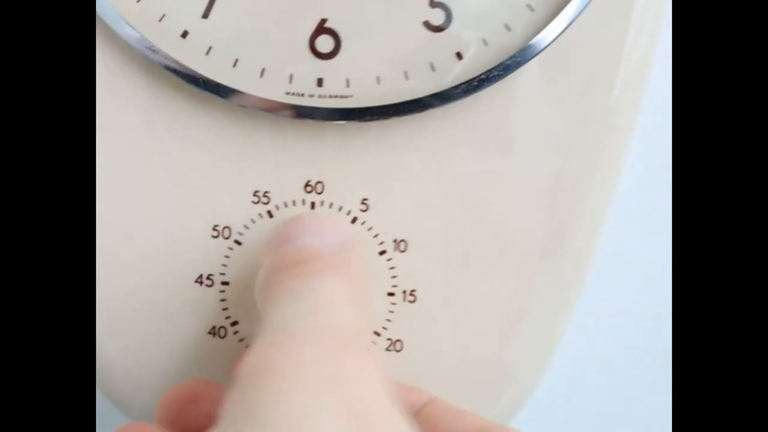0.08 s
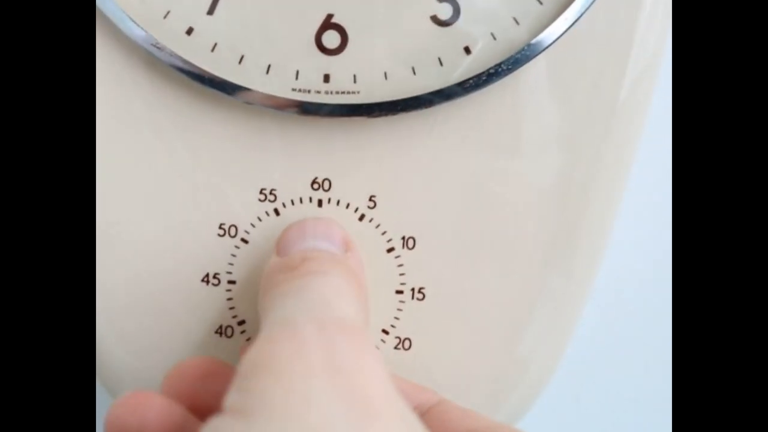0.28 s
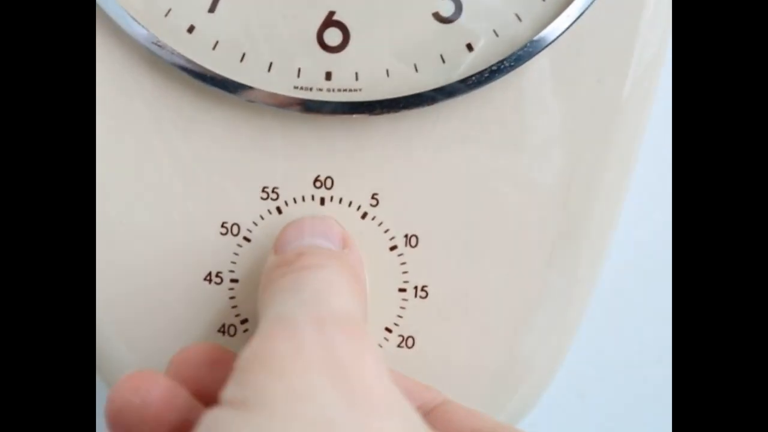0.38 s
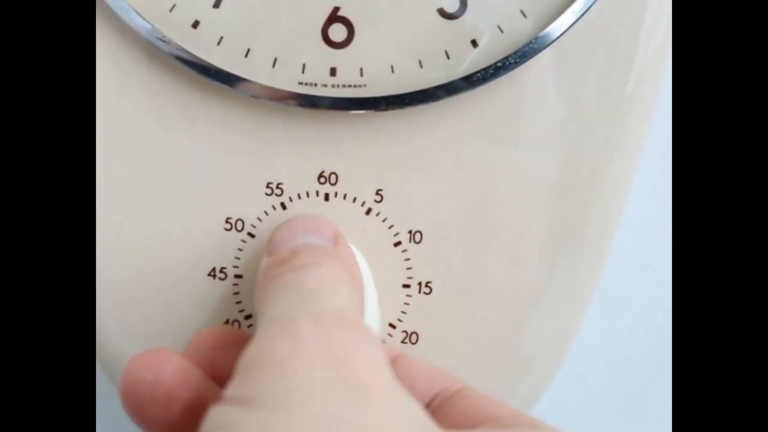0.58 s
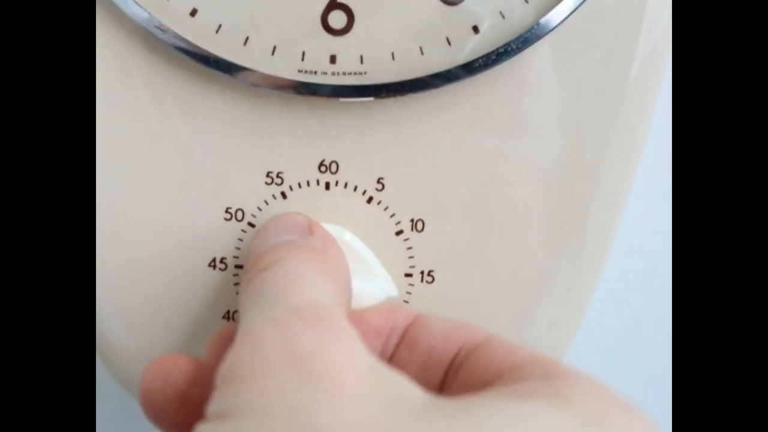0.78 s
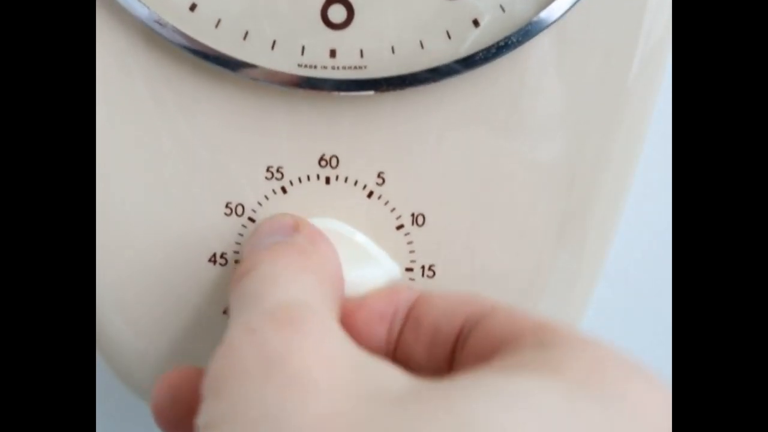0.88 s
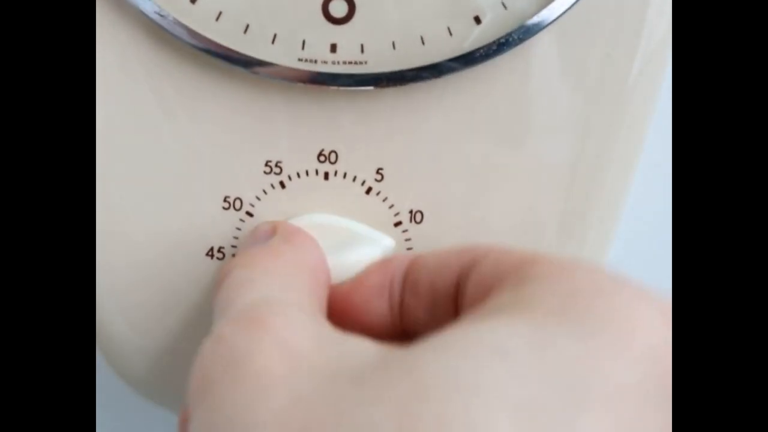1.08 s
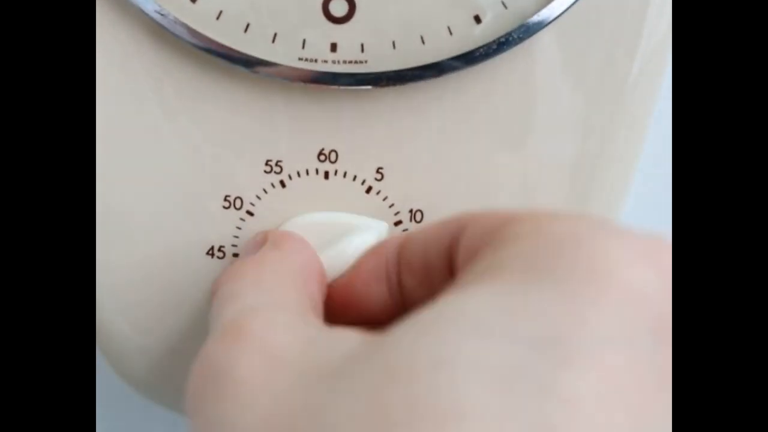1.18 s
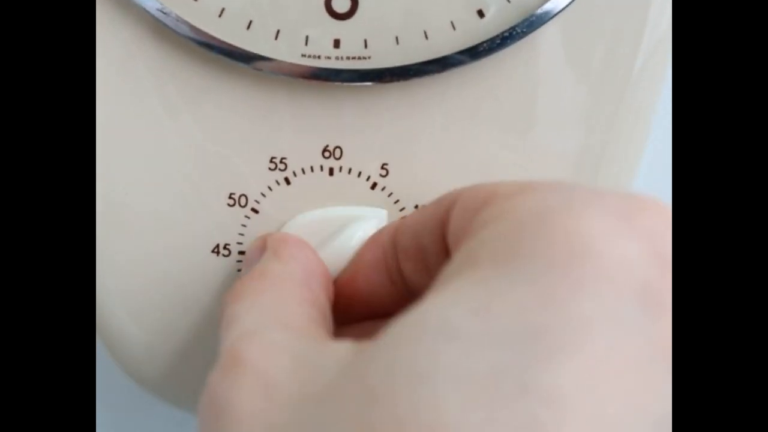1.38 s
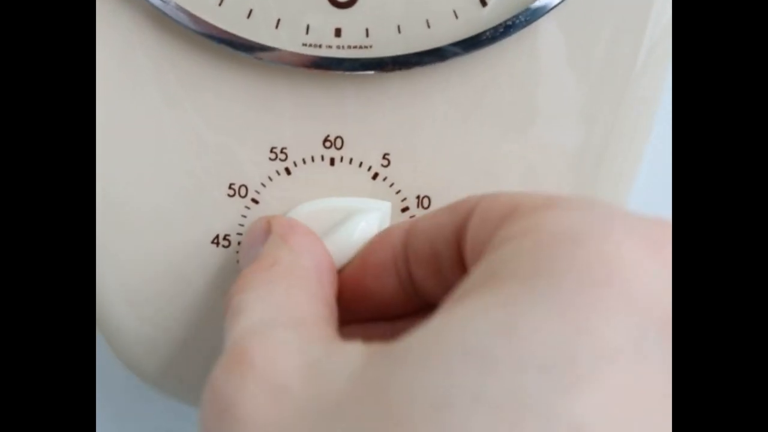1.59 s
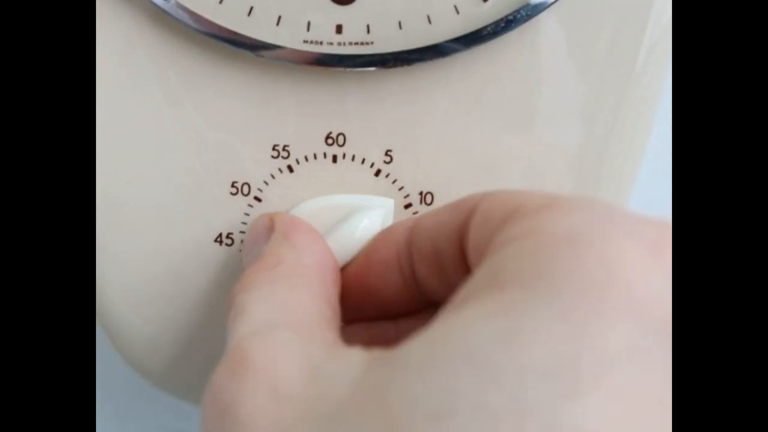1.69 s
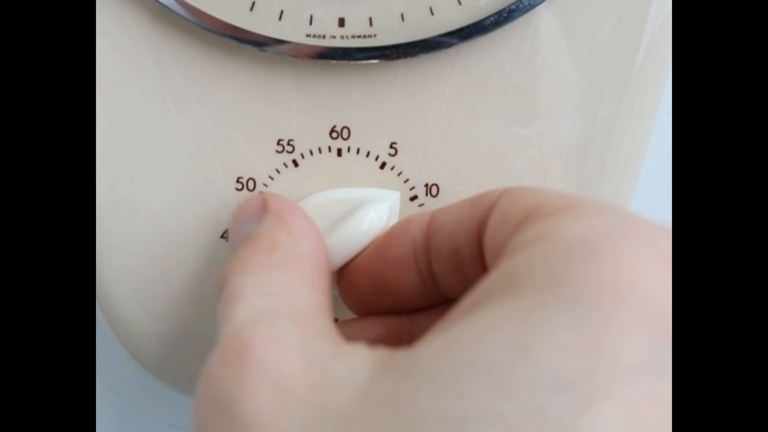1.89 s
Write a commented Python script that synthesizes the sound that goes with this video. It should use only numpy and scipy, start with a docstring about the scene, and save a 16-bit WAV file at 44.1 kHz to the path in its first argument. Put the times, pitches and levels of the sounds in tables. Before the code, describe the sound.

Ratchet clicks of a mechanical timer being wound by hand, after one dull knock, close up.

```python
"""Faint brushes and soft ticks come first, then a dull knock: a hand winds a ceramic kitchen clock timer, close by.
The knob knocks on the hollow case; then a pawl snaps over the ratchet teeth and rings the steel works and the case.
Decaying sine waves make the rings; short bursts of coloured noise make the cracks, rattles and brushes.
The escapement ticks faintly underneath, about four times a second, with a short room echo, air noise and a low hum."""
import sys
import numpy as np
from scipy import signal
from scipy.fft import rfft, irfft
from scipy.io import wavfile

SR = 44100
rng = np.random.default_rng(int(sys.argv[2]) if len(sys.argv) > 2 else 0)


def to_wav(s):
    """Save 16-bit WAV."""
    ch = np.atleast_2d(s).T  # columns
    pcm = np.round(np.clip(ch, -1, 1) * 32767)  # PCM
    wavfile.write(sys.argv[1], SR, pcm.astype(np.int16))


N = 83790  # length of the scene in samples
RING_S = 0.5  # longest time that any single blow or echo may ring
T = np.arange(int(RING_S * SR)) / SR  # time since a blow, in seconds

MODE_SCATTER_DB = 2.5  # how much a mode's level differs from one blow to the next
WORKS_PAN_DB = -3  # left level minus right level, for the ratchet and the shaft

# ways the hollow case rings: pitch_hz [Hz], knocked_db [dB, relative],
# pawl_db [dB, relative, under the pawl], t60_s [s to fall 60 dB]
CASE_MODES = [(302.2, -4.5, -8, 0.37), (361.4, 0.5, -1.5, 0.13), (390.6, -12.5, -2, 0.15),
              (433.8, 7, 4.5, 0.16), (503, 13, 9, 0.012), (586, 6, -20, 0.063), (671.3, 1.5, -14, 0.28),
              (775, 3.5, -10, 0.069), (885, -7, -10, 0.18), (993, -6.5, -16.5, 0.35),
              (1064, -2, -2.5, 0.05), (1150, -17, -8, 0.035), (1300, -4, -30, 0.11), (2440, -10, -33, 0.12),
              (2460, -1, -42, 0.13)]
# colour of the rattling gears: pitch_hz [Hz], level_db [dB per Hz, relative]
GEAR_COLOUR = [(250, -27), (420, 8), (700, -4), (1000, 6), (1450, -2), (2000, 2), (3000, 6.5), (3900, 0),
               (4700, 2.5), (6800, -4), (8200, -8.5), (10000, -8), (15000, -44)]


def amp(db):
    """Turn decibels into a gain."""
    return 10 ** (np.asarray(db) / 20)


def fade(t60):
    """Exponential decay, 60 dB down after t60 seconds."""
    return np.exp(-np.log(1000) * T / t60)


def sine(hz, phase=0):
    """A steady sine wave as long as one ring."""
    return np.sin(2 * np.pi * hz * T + phase)


def per_bin(points, size):
    """Read a table over frequency at every bin of a transform."""
    hz, value = np.array(points, float).T
    bin_hz = np.arange(size // 2 + 1) * SR / size
    return np.interp(np.log(bin_hz + 1), np.log(hz), value)


def response(points, size=2048):
    """A filter with the given spectrum and unit energy that starts at once (minimum phase)."""
    cepstrum = irfft(np.log(amp(per_bin(points, size))))
    # fold the second half onto the first, so that nothing sounds before time zero
    cepstrum[1:size // 2] *= 2
    cepstrum[size // 2 + 1:] = 0
    h = irfft(np.exp(rfft(cepstrum)))
    return h / np.linalg.norm(h)


def through(x, h):
    """Pass a sound through a response, keeping its length."""
    filtered = signal.fftconvolve(np.atleast_2d(x), np.atleast_2d(h), axes=1)
    return filtered[:, :x.shape[-1]]


def noise(likeness, size):
    """Stereo white noise with a left-right correlation (one value or one per bin)."""
    c = np.clip(likeness, 0, 1)
    mid, side = rfft(rng.standard_normal((2, size)))
    mid = mid * np.sqrt((1 + c) / 2)
    side = side * np.sqrt((1 - c) / 2)
    return irfft(np.array([mid + side, mid - side]), size)


def burst(likeness, rise, t60):
    """Noise like countless close modes dying together; about unit energy in each channel."""
    envelope = (1 - np.exp(-T / rise)) * fade(t60)
    return noise(likeness, len(T)) * envelope / np.linalg.norm(envelope)


def pan(db):
    """Left and right gains for a level difference."""
    return amp(np.array([[db], [-db]]) / 2)


def add(out, s, sound):
    """Mix a sound in at a time in seconds."""
    i = max(int(s * SR), 0)
    n = min(sound.shape[-1], N - i)
    out[:, i:i + n] += sound[..., :n]


def case_under_pawl():
    """Low ring of the case after one snap: decaying sines, slightly different in level and pitch each time."""
    jitter = 0.012  # spread of the pitch, as a fraction
    t = T[:len(T) // 2]
    ring = np.zeros(len(t))
    for k, (hz, _, level_db, t60) in enumerate(CASE_MODES):
        size, detune = rng.standard_normal(2)
        wave = np.sin(2 * np.pi * hz * (1 + jitter * detune) * t)
        # neighbouring modes start in opposite directions
        ring += (-1) ** k * amp(level_db + 2 * size) * fade(t60)[:len(t)] * wave
    return ring


def ratchet():
    """The pawl falls off each tooth: a gritty crack, a ring of the works, a gear rattle and a low case ring."""
    # pawl snaps: start_s [s], level_db [dB, relative], case_ring_db [dB, relative]
    snaps = [(0.5025, -1, -2.5), (0.529, 1, -2), (0.5318, -7.5, -15), (0.613, -4, -8.5),
             (0.6158, 0.5, -5.5), (0.6382, 0.5, -9.5), (0.6429, -0.5, -3.5), (0.6662, 2, 0.5),
             (.7080, 0, -1.5), (0.7392, -0.5, -1), (0.7576, 1.5, 1), (0.8016, 1, -1), (0.8517, 2, -38),
             (0.8541, -5, -3), (0.8735, 3.5, -2.5), (0.8947, 1.5, 0), (0.947, -9.5, -6.5),
             (0.9610, -5, -30), (0.9637, -1, -1.5), (0.9879, -1, -0.5), (1.0145, -3.5, -16),
             (1.044, -2, 0.5), (1.0687, -1, 0), (1.0939, 1, -2.5), (1.1137, -5.5, -9), (1.124, -3.5, -12),
             (1.1481, 1, -3), (1.1776, -2, -9), (1.2038, 1, -0.5), (1.2293, 0.5, -6.5), (1.2578, 0, -2.5)]
    # ways the steel works ring: pitch_hz [Hz], level_db [dB, relative], t60_s [s]
    works_modes = [(1817, -1.5, 0.13), (1941, 7.5, 0.055), (2027, 11, 0.032), (2332, 2.5, 0.043),
                   (2460, 6.5, 0.12), (2695, 17.5, 0.0092), (2910, 7, 0.1), (3350, -21, 0.063),
                   (3498, 8.5, 0.051), (3597, 8.5, 0.048), (4120, -27, 0.064), (4450, -1, 0.099),
                   (4653, 14.5, 0.02), (5100, -6, 0.024), (5530, -27, 0.048), (5840, -5, 0.082),
                   (6070, 3.5, 0.055), (6920, 1.5, 0.062), (9840, -8.5, 0.12)]
    # colour of the first crack: pitch_hz [Hz], level_db [dB per Hz, relative]
    crack_colour = response([(1200, -24), (3000, -15), (3900, 5.5), (4700, 9.5), (6300, 4), (7200, 0),
                             (8500, -8.5), (12000, -11.5), (16000, -15)])
    crack_db, rattle_db, works_db, case_db = -10, -6.5, -41, -36
    crack_growth_db_per_s = 6  # the pawl snaps harder as the spring winds up
    crack_pan_db = -3
    grit, grit_t60_s = 1, 0.013
    phase_spread = 1.15  # left-right phase difference of a mode, radians
    rattle_same = 0.41  # share of the rattle's energy that is alike in every snap
    rattle = dict(likeness=0.69, rise=0.00024, t60=0.074)  # rise and t60 in seconds

    out = np.zeros((2, N))
    shared_rattle = burst(**rattle)
    gear_colour = response(GEAR_COLOUR)
    modes = []
    for k, (hz, level_db, t60) in enumerate(works_modes):
        phase = phase_spread * rng.choice([-1, 1]) * np.array([[0.5], [-0.5]])
        modes.append((-1) ** k * amp(level_db) * fade(t60) * sine(hz, phase))
    modes = np.array(modes)
    middle_s = np.mean([row[0] for row in snaps])

    for s, db, case_ring_db in snaps:
        click = signal.unit_impulse(len(T)) + grit * burst(0, 0.0001, grit_t60_s)
        crack = through(click, crack_colour)
        growth_db = crack_growth_db_per_s * (s - middle_s)
        add(out, s, amp(db + crack_db + growth_db) * pan(crack_pan_db) * crack)

        gears = np.sqrt(rattle_same) * shared_rattle + np.sqrt(1 - rattle_same) * burst(**rattle)
        add(out, s, amp(db + rattle_db) * pan(WORKS_PAN_DB) * through(gears, gear_colour))

        scatter_db = MODE_SCATTER_DB * rng.standard_normal((len(works_modes), 1, 1))
        works = (amp(scatter_db) * modes).sum(0)
        add(out, s, amp(db + works_db) * pan(WORKS_PAN_DB) * works)

        add(out, s, amp(case_db + case_ring_db) * case_under_pawl())
    return out


def knob():
    """Dull knocks ring the hollow case, which radiates little bass, and shake the gears; longer contact is duller."""
    # knocks on the case: start_s [s], level_db [dB, relative], contact_ms [ms, sets the width of the push]
    knocks = [(0.2373, -1.5, 0.39), (.349, -23, 0.59), (.362, -16, 1), (.392, -20, 1), (0.5363, -10, 0.8),
              (0.5429, -10, 0.7), (.652, -13.5, 1)]
    # colour of the thud: pitch_hz [Hz], level_db [dB per Hz, relative]
    thud = response([(40, -34.5), (160, -9), (255, -46), (385, 12), (600, -5.5), (1120, 6.5), (1450, -19.5),
                     (2000, -45.5), (12000, -60)])
    # colour of the gears shaken by a knock: pitch_hz [Hz], level_db [dB per Hz, relative]
    shake_colour = response([(40, -7), (150, 8.5), (500, 2), (2000, 0.5), (2500, -0.5), (3400, 1),
                             (4400, -13), (7000, -22.5), (14000, -33)])
    thud_db, case_db, clatter_db, shake_db = 11, -25.5, 8, -2
    clatter_t60_s, shake_t60_s = 0.089, 0.1
    case_low_hz = 306  # the ringing case radiates little below this
    lead_s = 0.001  # the push starts before its peak

    out = np.zeros((2, N))
    body = amp(case_db) * sum(amp(db) * fade(t60) * sine(hz) for hz, db, _, t60 in CASE_MODES)
    radiate = signal.butter(5, case_low_hz, "high", fs=SR, output="sos")
    for s, db, contact_ms in knocks:
        # a smooth bell-shaped push; a wider one holds less treble
        push = np.exp(-(np.pi * (T - lead_s) * 1000 / contact_ms) ** 2)
        push /= push.sum()
        clatter = amp(clatter_db) * through(burst(0.67, 0.00084, clatter_t60_s), thud)
        ring = signal.sosfilt(radiate, through(push, body + clatter))
        knock = ring + amp(thud_db) * through(push, thud)
        add(out, s - lead_s, -amp(db) * knock)

        shake = through(burst(0.22, 0.00042, shake_t60_s), shake_colour)
        add(out, s, amp(db + shake_db) * shake)
    return out


def escapement():
    """Soft, bright ticks from inside the case: a tiny contact, a short rattle and the ping of the lever."""
    # ticks: start_s [s], level_db [dB, relative]
    ticks = [(0.1124, 10.5), (0.198, 2), (0.342, 7.5), (0.353, 13.5), (0.599, 0), (0.858, 16.5),
             (1.115, 20), (1.346, 14), (1.354, 18), (1.616, 8), (1.805, 2), (1.859, 9)]
    # colour of a tick: pitch_hz [Hz], level_db [dB per Hz, relative]
    tick_colour = response([(300, -15), (1000, 2.5), (1600, -12.5), (2900, 3.5), (3300, -4), (3900, -1.5),
                            (5200, 0), (7200, -8), (8800, -22), (10200, -10.5), (12000, -74), (16000, -58)])
    # ways the lever rings: pitch_hz [Hz], level_db [dB, relative]
    lever_modes = [(2560, -32), (3300, -28.5), (5480, -35.5), (7200, -36)]
    tick_db, contact_db = -23, -21  # contact_db: the hard first contact, against the rattle
    rise_s, rattle_t60_s, lever_t60_s = 0.00083, 0.092, 0.064

    out = np.zeros((2, N))
    contact = amp(contact_db) * signal.unit_impulse(len(T))
    rattle = through(contact + burst(0.53, rise_s, rattle_t60_s), tick_colour)
    envelope = fade(lever_t60_s) * (1 - np.exp(-T / rise_s))
    for s, db in ticks:
        ping = np.zeros(len(T))
        for hz, level_db in lever_modes:
            ping += amp(level_db + MODE_SCATTER_DB * rng.standard_normal()) * sine(hz)
        add(out, s, amp(tick_db + db) * (rattle + envelope * ping))
    return out * pan(db=-1.5)


def shaft():
    """The turning shaft scrapes: dense, tiny, random slips shake the gears."""
    # scrapes: start_s [s], length_s [s], level_db [dB, relative]
    scrapes = [(0.571, 0.12, -4), (0.717, 0.061, -4.5), (0.827, 0.038, 4.5), (0.973, 0.052, -4),
               (0.998, 0.35, -6.5)]
    scrape_db, slips_per_s, scatter_db = -38, 2200, 5

    t = np.arange(N) / SR
    size = amp(scatter_db * rng.standard_normal(N))
    happens = rng.random(N) < slips_per_s / SR
    slips = happens * size * rng.choice([-1, 1], N)
    effort = np.zeros(N)
    for s, length, db in scrapes:
        # each scrape rises and falls in one rounded hump
        hump = np.sin(np.pi * np.clip((t - s) / length, 0, 1)).clip(0)
        effort += amp(db) * np.sqrt(hump)
    gears = through(burst(0.97, 0.00021, 0.049), response(GEAR_COLOUR))
    return amp(scrape_db) * pan(WORKS_PAN_DB) * through(effort * slips / slips.std(), gears)


def fingers():
    """Fingers nudge and brush the knob: faint noise bursts through a narrow resonance."""
    # touches: start_s [s], level_db [dB], pitch_hz [Hz, centre], t60_s [s]
    touches = [(0.061, -12, 976, 0.033), (0.166, -21, 2260, 0.054), (0.401, -21, 2270, 0.063),
               (1.352, -11.5, 976, 0.32), (1.387, -13.5, 446, 0.17), (1.54, -20.5, 2200, 0.035),
               (1.78, -22, 2220, 0.081), (1.806, -20, 5550, 0.065)]
    sharpness = 9  # centre frequency divided by bandwidth

    out = np.zeros((2, N))
    for s, db, hz, t60 in touches:
        b, a = signal.iirpeak(hz, sharpness, fs=SR)
        brush = signal.lfilter(b, a, burst(0.94, 0.002, t60))
        add(out, s, amp(db) * brush / np.linalg.norm(brush))
    return out


def room_echo(timer):
    """A short, diffuse echo: the sound is smeared by a noise burst that swells briefly and dies away."""
    # how alike left and right are: pitch_hz [Hz], correlation [0 to 1]
    echo_likeness = [(100, .95), (500, 0.88), (1200, 0.7), (3000, 0.046), (15000, 0.044)]
    echo_db, rise_s, t60_s = -14, 0.029, 0.36
    echo = amp(echo_db) * burst(per_bin(echo_likeness, len(T)), rise_s, t60_s)
    return through(timer.mean(0), echo)


def air():
    """Steady room noise, shaped over frequency, and a low sine hum that swells and sinks."""
    # colour of the room noise: pitch_hz [Hz], level_db [dB per Hz, relative]
    air_colour = [(15, -57), (25, -37), (43, 2), (80, -3), (134, 0.5), (249, -6), (326, -4.5), (624, -9.5),
                  (1070, -11.5), (1440, -7.5), (1560, -12), (2000, -10.5), (3920, -18.5), (5880, -19.5),
                  (16000, -33)]
    # how alike left and right are: pitch_hz [Hz], correlation [0 to 1]
    air_likeness = [(30, 1), (150, 0.86), (400, 0.68), (1200, 0.21), (4000, 0.02), (15000, 0.028)]
    # swell of the hum: time_s [s], level_db [dB, relative]
    hum_swell = [(0, -20), (.3, 5), (.45, 10), (.9, 6.5), (1.05, 2), (1.9, -19)]
    air_db, hum_db, hum_hz = -46.5, -60.5, 62.1

    white = noise(per_bin(air_likeness, N), N)
    bed = irfft(rfft(white) * amp(per_bin(air_colour, N)), N)
    t = np.arange(N) / SR
    swell_db = np.interp(t, *np.array(hum_swell).T)
    hum = amp(hum_db + swell_db) * np.sin(2 * np.pi * hum_hz * t)
    # the square root of 2 makes the hum's levels average (RMS) levels
    return amp(air_db) * bed / bed.std() + np.sqrt(2) * hum


def scene():
    """The timer, its short room echo and the background."""
    timer = ratchet() + knob() + escapement() + shaft() + fingers()
    return timer + room_echo(timer) + air()


def record(dry):
    """The recorder cuts the treble steeply above 16 kHz."""
    top_hz = 16000
    low_pass = signal.ellip(8, 0.2, 70, top_hz, fs=SR, output="sos")
    return signal.sosfilt(low_pass, dry)


dry = scene()
out = record(dry)
to_wav(out)
```